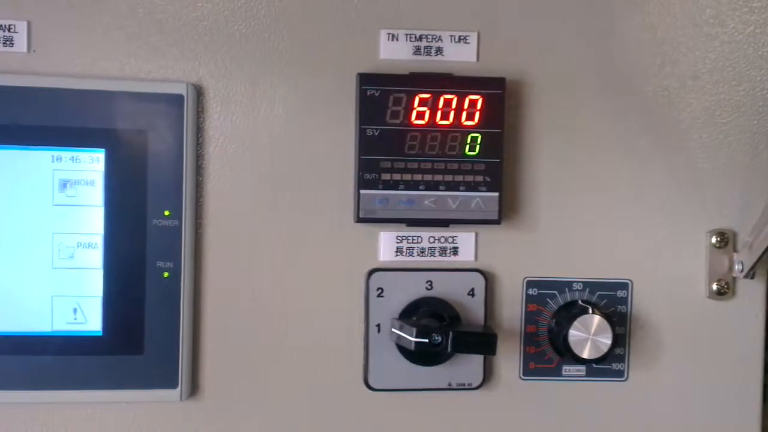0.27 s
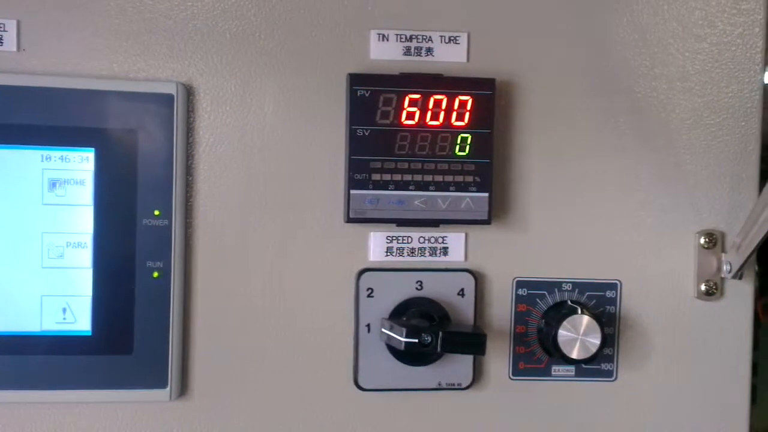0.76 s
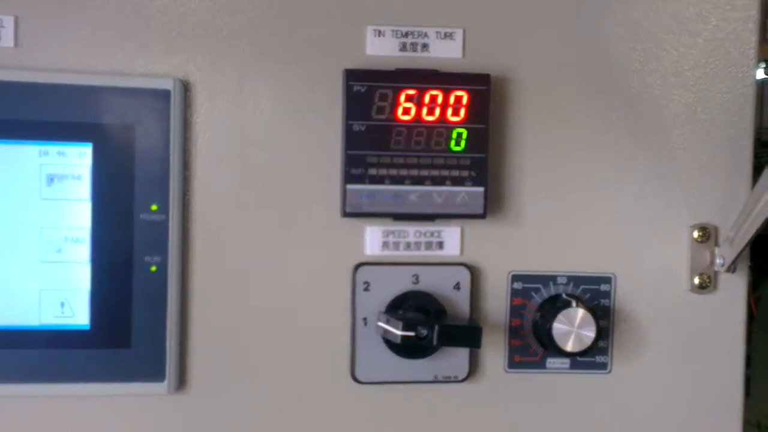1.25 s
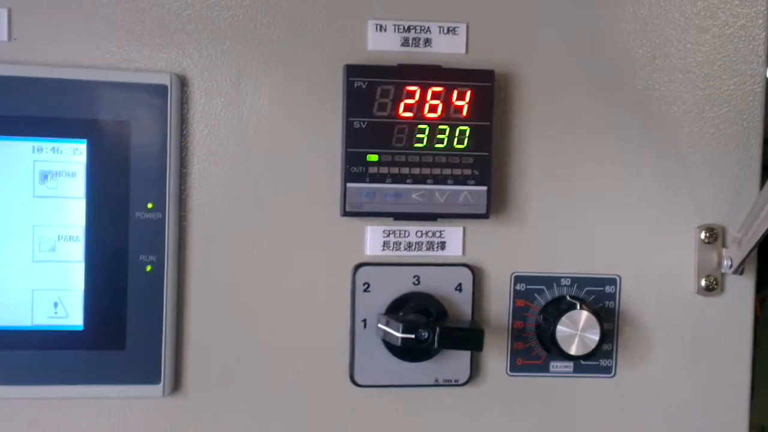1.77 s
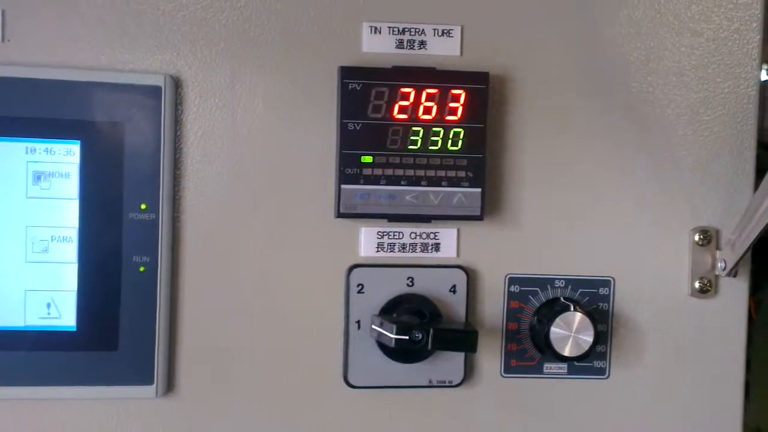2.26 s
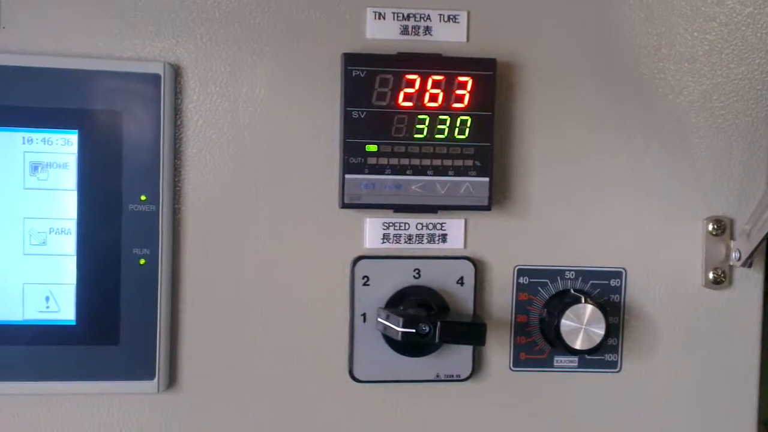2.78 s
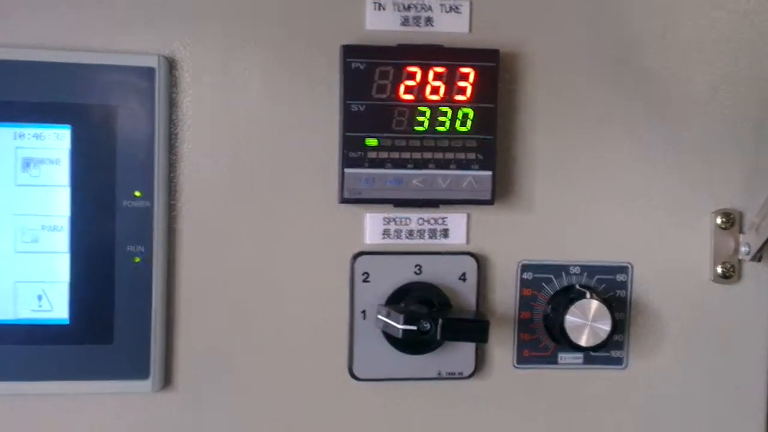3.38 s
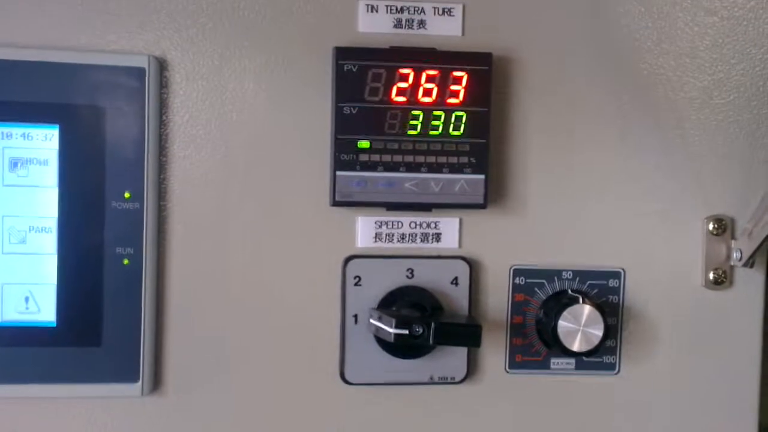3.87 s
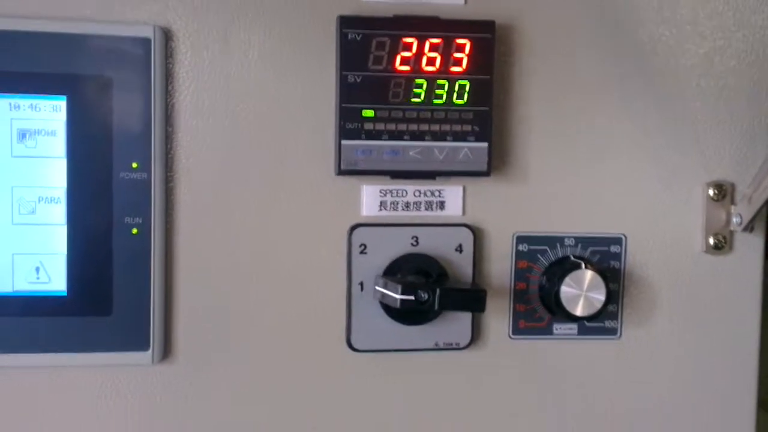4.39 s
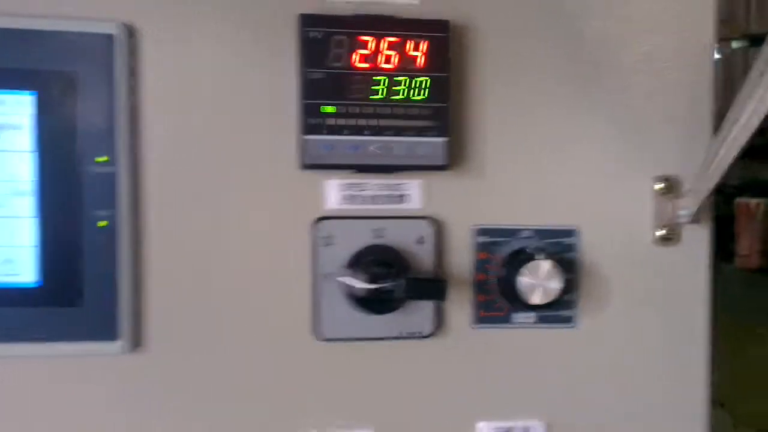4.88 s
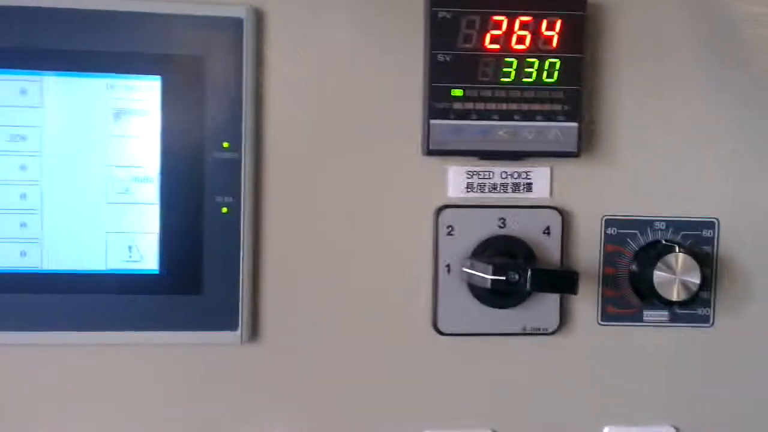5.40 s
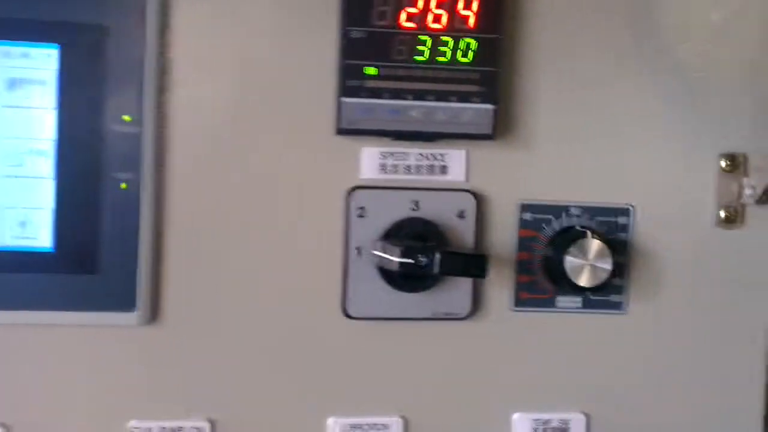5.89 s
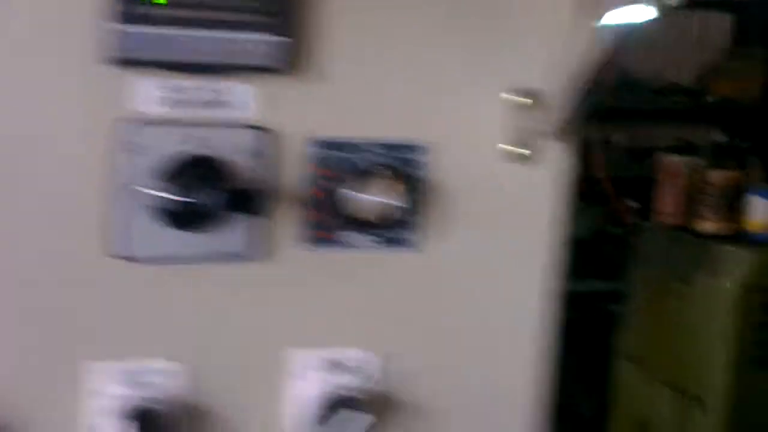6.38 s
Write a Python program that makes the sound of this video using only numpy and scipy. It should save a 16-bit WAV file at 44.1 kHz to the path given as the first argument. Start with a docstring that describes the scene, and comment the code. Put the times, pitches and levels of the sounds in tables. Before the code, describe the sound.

A quiet workshop murmurs around a machine control panel while gas leaks with a thin wavering hiss and soft puffs. Just before one second a sliding part squeals and scrapes; later a relay clicks and a panel hums faintly. Then a valve snaps open and a loud, bright, fluttering gas jet continues to the end, with a pump droning beneath. The close hand-held microphone overloads slightly on peaks.

```python
"""A loud, fluttering jet of gas hisses from an opening valve: shaped noise, ringing pipe tones and whistles. A
pump motor drones under it: harmonics of its stroke rate sound through two resonances of its casing. Before
that, a gas line leaks and puffs faintly in a murmuring workshop (shaped noise), a sliding part squeals (shaky
tone, ringing and scrape), something scrapes briefly, a relay clicks (noise burst) and a panel hums (two
resonances). The hand-held microphone is close enough to overload on the peaks of the jet."""
import sys
import numpy as np
from scipy import signal
from scipy.fft import rfft, irfft
from scipy.io import wavfile
from scipy.ndimage import uniform_filter1d

SR = 44100
rng = np.random.default_rng(int(sys.argv[2]) if len(sys.argv) > 2 else 0)


def dump(signal):
    """Clip the signal to [-1, 1] and save it as 16-bit WAV at the path in sys.argv[1]."""
    limited = np.clip(np.atleast_2d(signal).T, -1, 1)
    pcm = np.round(limited * 32767).astype(np.int16)
    wavfile.write(sys.argv[1], SR, pcm)


N = 293265
TIME = np.arange(N) / SR  # seconds


def amp(db):
    """Turns decibels into a gain."""
    return 10 ** (np.asarray(db) / 20)


def unit(x):
    """Scales a signal to rms 1."""
    return x / np.sqrt(np.mean(x ** 2) + 1e-20)


def follow(rows, column=1):
    """Draws straight lines between the points of a table, giving one value per sample."""
    rows = np.asarray(rows)
    return np.interp(TIME, rows[:, 0], rows[:, column])


def at_hz(points, hz):
    """Reads a spectrum at the given pitches, on a log-frequency axis."""
    point_hz, value = np.transpose(points)
    return np.interp(np.log(hz + 1), np.log(point_hz + 1), value)


def bump(peak_s, length_s):
    """Makes a bell in time, length_s wide at half its height."""
    return .5 ** ((2 * (TIME - peak_s) / length_s) ** 2)


def swell(start_s, db, attack_s, hold_s, fade_db_per_s):
    """Makes an envelope: a straight attack, a hold and a steady fade in decibels."""
    age = TIME - start_s
    fade_db = fade_db_per_s * np.maximum(age - attack_s - hold_s, 0)
    return np.clip(age / attack_s, 0, 1) * amp(db - fade_db)


def panned(db):
    """Gives left and right gains for a level difference, left minus right."""
    return amp(np.array([db, -db]).reshape(2, -1) / 2)


def wander(rate_hz):
    """Makes slow random motion of rms 1, up to about rate_hz."""
    ticks = TIME[::32]  # slow motion needs fewer points
    hz = np.fft.rfftfreq(len(ticks), ticks[1])
    spectrum = rfft(rng.standard_normal(len(ticks))) / (1 + (hz / rate_hz) ** 4)
    slow = irfft(spectrum, len(ticks))
    return np.interp(TIME, ticks, unit(slow))


def patches(field, size):
    """Smooths a random field (channel, frame, bin) over size = (frames, bins), then scales it to rms 1."""
    over_time = uniform_filter1d(field, size[0], axis=1)
    return unit(uniform_filter1d(over_time, size[1], axis=2))


# how alike the noise is in the left and right channels
# columns: pitch_hz [Hz], likeness [1 = identical]
LIKENESS = [(100, .7), (650, 0.75), (1300, 0.08), (3000, 0.22), (7000, .28), (14000, 0.23)]


def noise(colour, comb_db=0, ripple_db=0):
    """Makes coloured stereo noise; far reflections comb it finely, near ones broadly, as the microphone moves."""
    hz, frames = np.fft.rfftfreq(2048, 1 / SR), N // 512 + 5
    real, imaginary, far, near = rng.standard_normal((4, 2, frames, len(hz)))
    left, other = real + 1j * imaginary
    same = np.clip(at_hz(LIKENESS, hz), -1, 1)
    right = same * left + np.sqrt(1 - same ** 2) * other
    # adding the mean makes the reflections partly shared by both channels
    fine_db = comb_db * patches(far + far.mean(0), size=(36, 2))
    broad_db = ripple_db * patches(near + near.mean(0), size=(50, 11))
    spectra = np.array([left, right]) * amp(at_hz(colour, hz) + fine_db + broad_db)
    sound = signal.istft(spectra.swapaxes(1, 2), nperseg=2048, noverlap=1536)[1][:, :N]
    return sound / sound.mean(0).std()


def ringing(modes):
    """Shakes resonances (pitch_hz, width_hz, level_db) with random noise, partly different left and right."""
    hz = np.fft.rfftfreq(N, 1 / SR)
    power = 0
    for pitch_hz, width_hz, db in modes:
        resonance = unit(1 / (1 + (2 * (hz - pitch_hz) / width_hz) ** 2))
        power = power + (amp(db) * resonance) ** 2
    drive = rng.standard_normal((2, N)) + 0.85 * rng.standard_normal(N)
    sound = irfft(rfft(drive) * np.sqrt(power), N)
    return sound / sound.mean(0).std()


# colour of the workshop's murmur
# columns: pitch_hz [Hz], relative_level_db [dB per Hz]
SHOP_COLOUR = [(40, -50), (90, -39), (180, -26.5), (260, -6.5), (380, -6), (450, 0.5), (600, 0.5), (860, 1),
               (1100, 0), (1500, -3), (2000, -8), (3000, -4.5), (5000, -58)]


def workshop(murmur_db=-45.5, whine_db=-54):
    """The room murmurs as gently wavering noise, with two narrow resonances as a faint whine."""
    murmur = noise(SHOP_COLOUR, comb_db=2.5, ripple_db=1.5) * panned(1.0)
    whine = ringing([(443, 6, -3), (865, 8, 0)])
    return amp(murmur_db + 0.43 * wander(6)) * murmur + amp(whine_db) * whine


# level of the leak before its random wavering
# columns: time_s [s], level_db [dB]
LEAK_LEVEL = [(0, -36.5), (.7, -34.3), (1.5, -36.5), (2.3, -34.5), (2.65, -35.5), (3.15, -34)]
# colour of the leak's hiss
# columns: pitch_hz [Hz], relative_level_db [dB per Hz]
LEAK_COLOUR = [(900, -34), (1700, -18.5), (2100, -17), (2450, -9.5), (3200, -6.5), (4200, -9.5),
               (5600, -13.5), (7400, -10), (9000, -14.5), (11000, -22.5), (12500, -32), (14700, -40)]


def leak():
    """Gas escaping through a small gap hisses as coloured noise of wavering level."""
    return amp(follow(LEAK_LEVEL) + .5 * wander(10)) * noise(LEAK_COLOUR, comb_db=1.5) * panned(1.2)


# soft puffs of escaping air, and at 1.95 s a brief scrape (two bands) # columns: peak_s [s], length_s [s],
# level_db [dB], pitch_hz [Hz], width_octaves [octaves]
SOFT_BURSTS = [(0.245, 0.29, -36.5, 3000, 0.47), (0.687, 0.19, -37.5, 2750, 0.46), (1.95, .2, -35, 3050, 0.37),
               (1.95, 0.22, -41, 1050, 0.43), (2.27, 0.099, -29.5, 3020, 0.66)]


def soft_bursts():
    """Each soft puff of air, or the brief scrape, is a band of noise that swells and fades."""
    hz, puffs = np.fft.rfftfreq(N, 1 / SR) + 1, 0
    for peak_s, length_s, db, pitch_hz, width_octaves in SOFT_BURSTS:
        band = 1 / (1 + (np.log2(hz / pitch_hz) / width_octaves) ** 2 / 2) ** 2
        drive = rng.standard_normal((2, N)) + 0.8 * rng.standard_normal(N)
        air = irfft(rfft(drive) * band, N)
        puffs = puffs + amp(db) * bump(peak_s, length_s) * unit(air)
    return puffs * panned(3.5)


# the relay's click
# columns: start_s [s], level_db [dB]
CLICKS = [(1.8015, -27.5)]
# colour of the click
# columns: pitch_hz [Hz], relative_level_db [dB per Hz]
CLICK_COLOUR = [(200, -50), (600, -16), (2000, -14), (2800, 2), (3900, -1), (4800, 2), (5400, -13),
                (7800, -6), (12000, -27), (15000, -50)]


def relay(snap_s=0.0034, tail_s=0.081, tail_db=-15):
    """The relay snaps as a short noise burst, with a weaker tail for the cabinet's echo."""
    envelope = 0
    for start_s, db in CLICKS:
        age = np.maximum(TIME - start_s, 0)
        snap = np.exp(-(age / snap_s) ** 2)
        echo = amp(tail_db) * np.exp(-age / tail_s)
        envelope = envelope + amp(db) * (TIME > start_s) * (snap + echo)
    return envelope * noise(CLICK_COLOUR)


# resonances of the humming panel
# columns: pitch_hz [Hz], width_hz [Hz], relative_level_db [dB]
HUM_MODES = [(501.1, 7.4, -0.19), (526, 6.7, -2)]
HUM_START_S, HUM_ATTACK_S, HUM_PEAK_S = 2.3, .06, 2.88
HUM_DB = -42.5  # at the peak, before the throb
HUM_GROWTH_DB_PER_S, HUM_FADE_DB_PER_S = 12, 35
HUM_THROB_HZ, HUM_THROB_DB = 4.3, 2.5


def panel():
    """Two close resonances of a panel hum; the hum throbs, grows slowly and dies faster."""
    to_peak = HUM_PEAK_S - TIME
    level_db = HUM_DB - np.maximum(HUM_GROWTH_DB_PER_S * to_peak, -HUM_FADE_DB_PER_S * to_peak)
    throb_db = HUM_THROB_DB * np.cos(2 * np.pi * HUM_THROB_HZ * to_peak)
    attack = np.clip((TIME - HUM_START_S) / HUM_ATTACK_S, 0, 1)
    return attack * amp(level_db + throb_db) * ringing(HUM_MODES)


# slips of the sliding part, weaker each time
# columns: start_s [s], squeal_level_db [dB], hold_s [s]
SLIPS = [(0.908, -14.5, .038), (.981, -19, .014), (1.024, -19.5, .068), (1.165, -26.5, .06)]
SLIP_ATTACK_S, SLIP_FADE_DB_PER_S = .013, 135
# resonances of the squeal; the first is played as a clean tone
# columns: pitch_hz [Hz], width_hz [Hz], relative_level_db [dB]
SQUEAL_MODES = [(3650, 25, -1), (3557, 81, -4.5), (3405, 190, -6), (3100, 390, -16)]
# colour of the dry scrape
# columns: pitch_hz [Hz], relative_level_db [dB per Hz]
SCRAPE_COLOUR = [(300, -37), (1200, -10), (2000, -7), (2600, 1), (4300, -2), (6000, -7), (8500, -7),
                 (13000, -37), (16000, -45)]
# resonances of the shuddering frame
# columns: pitch_hz [Hz], width_hz [Hz], relative_level_db [dB]
FRAME_MODES = [(466, 73, 1), (660, 160, -0.5), (855, 140, 4), (1190, 110, -6.5)]
# envelopes of the scrape and the shudder, both starting with the first slip
# columns: level_db [dB], attack_s [s], hold_s [s], fade_db_per_s [dB per s]
SCRAPE_SHAPE = (-28, .012, .1, 38)
SHUDDER_SHAPE = (-31.5, 0, .13, 150)
# the frame knocks as the part gets going
# columns: peak_s [s], length_s [s], change_db [dB]
KNOCK = (0.94, .022, 5.4)


def slide(chatter_db=1.3, breakup_db_per_s=45):
    """A part sticks and slips along its guide: a chattering squeal, a dry scrape and a shudder of the frame."""
    start_s = SLIPS[0][0]
    (pitch_hz, waver_hz, tone_db), *side_modes = SQUEAL_MODES
    shaky_hz = pitch_hz + 0.67 * waver_hz * wander(60)
    tone = np.sqrt(2) * np.sin(2 * np.pi * np.cumsum(shaky_hz) / SR)
    # the clean note breaks up as the part slows
    purity = amp(tone_db - breakup_db_per_s * np.clip(TIME - start_s, 0, 1))
    voice = purity * tone + amp(-5.5) * ringing(side_modes)
    slip_power = sum(swell(s, db, SLIP_ATTACK_S, hold_s, SLIP_FADE_DB_PER_S) ** 2 for s, db, hold_s in SLIPS)
    squeal = np.sqrt(slip_power) * amp(chatter_db * wander(90)) * voice
    scrape = swell(start_s, *SCRAPE_SHAPE) * noise(SCRAPE_COLOUR, comb_db=4.0)
    knock_s, knock_length_s, knock_db = KNOCK
    knock = amp(knock_db * bump(knock_s, knock_length_s))
    shudder = swell(start_s, *SHUDDER_SHAPE) * knock * ringing(FRAME_MODES)
    return squeal + scrape + shudder


# the pump's speed
# columns: time_s [s], strokes_hz [strokes per s]
PUMP_SPEED = [(3.2, 46), (4.0, 44.8), (4.5, 42.3), (4.85, 42.3), (5.2, 43.7), (6.65, 43.7)]
# the pump works up and eases off
# columns: time_s [s], effort_db [dB]
PUMP_EFFORT = [(3.2, -46), (3.6, -35), (4.2, -37), (4.9, -27), (5.55, -21.7), (6.4, -31), (6.65, -30)]
# low and high resonances of the casing
# columns: pitch_hz [Hz], relative_level_db [dB]
PUMP_LOW = [(300, -29.5), (350, -16), (435, -17.5), (478, 1.5), (500, 5), (525, 2.5), (565, -41),
            (612, -0.5), (660, -16)]
PUMP_HIGH = [(650, -19), (700, -7), (740, 5.5), (825, 8.5), (872, -12), (915, 7), (960, -18), (1048, -3),
             (1180, -17), (1265, -4.5), (1350, -33), (1530, -6), (1660, -19), (1750, -30)]
# moments when the low resonance booms
# columns: peak_s [s], length_s [s], change_db [dB]
BOOMS = [(3.76, .14, 8), (4.25, .2, 3), (4.882, .12, 8.5), (5.13, .07, 9), (5.79, .14, 5.5)]
# the low resonance has LOW_DB at the reference effort and follows a share of the effort's changes
LOW_DB, REFERENCE_EFFORT_DB, LOW_SHARE = -37, -27.5, .65
LOW_PAN_DB, HIGH_PAN_DB = -7.5, -4.5  # left minus right: both sit to the right


def pump(turns, rough=0.51, waver_db=1.1):
    """Wavering harmonics of the stroke rate slide through the low and the high resonances of the casing."""
    speed_hz, effort_db, sound = follow(PUMP_SPEED), follow(PUMP_EFFORT), 0
    boom_db = sum(db * bump(peak_s, length_s) for peak_s, length_s, db in BOOMS)
    low_db = LOW_DB + LOW_SHARE * (effort_db - REFERENCE_EFFORT_DB) + boom_db
    for casing, level_db, pan_db in [(PUMP_LOW, low_db, LOW_PAN_DB), (PUMP_HIGH, effort_db, HIGH_PAN_DB)]:
        drone = 0
        first, last = np.ceil(casing[0][0] / speed_hz[-1]), casing[-1][0] / speed_hz[-1]
        for multiple in np.arange(first, last):
            phase = 2 * np.pi * (multiple * turns + rng.random()) + 0.68 * wander(9.6)
            strength = amp(at_hz(casing, multiple * speed_hz)) * (1 + rough * wander(10.3))
            drone = drone + strength * np.cos(phase)
        sound = sound + amp(level_db + waver_db * wander(5.4)) * unit(drone) * panned(pan_db)
    return sound


# level of the low roar, before the flow's changes
# columns: time_s [s], level_db [dB]
ROAR_LEVEL = [(3.2, -31.5), (3.55, -29.5), (4.2, -28.7), (4.5, -26), (4.8, -27.8), (5.4, -25.5),
              (6.65, -28.5)]
# colour of the low roar
# columns: pitch_hz [Hz], relative_level_db [dB per Hz]
ROAR_COLOUR = [(180, -44), (320, -26.5), (430, -10), (500, -18), (570, -5), (680, -3.5), (820, 2),
               (1000, 0.5), (1300, -2.5), (1500, 2), (1850, -0.5), (2200, -2), (2900, -15), (4800, -70)]
# the roar starts thin: edge of its bass, change of the bass at first, time to fill in
BASS_EDGE_HZ, BASS_THIN_DB, BASS_FILL_S = 1050, -7, 1.5


def roar(age, comb_db=4.6, ripple_db=2.7):
    """The jet's low roar is noise whose bass fills in with the time since the valve opened."""
    full = noise(ROAR_COLOUR, comb_db=comb_db, ripple_db=ripple_db)
    low_pass = signal.butter(4, BASS_EDGE_HZ, fs=SR, output="sos")
    bass = signal.sosfiltfilt(low_pass, full)
    bass_gain = amp(BASS_THIN_DB * np.maximum(1 - age / BASS_FILL_S, 0))
    return amp(follow(ROAR_LEVEL)) * (full - bass + bass_gain * bass) * panned(-1.8)


# the nozzle sings briefly at changing pitches; levels before the flow's changes
# columns: peak_s [s], length_s [s], level_db [dB], pitch_hz [Hz], width_hz [Hz]
WHISTLES = [(3.46, .3, -30.5, 1466, 16), (4.2, .35, -26, 4480, 170), (4.5, .12, -35, 1466, 30),
            (5.0, .12, -24, 3400, 400), (5.32, .22, -20.5, 2770, 220)]


def nozzle_whistles():
    """Each whistle is a tone that swells and fades while turbulence shakes its pitch."""
    whistles = 0
    for peak_s, length_s, db, pitch_hz, width_hz in WHISTLES:
        shaky_hz = pitch_hz + .5 * width_hz * wander(width_hz)
        tone = np.sqrt(2) * np.sin(2 * np.pi * np.cumsum(shaky_hz) / SR)
        whistles = whistles + amp(db) * bump(peak_s, length_s) * tone
    return whistles


# levels of the bright hiss and the pipe's band, before the flow's changes
# columns: time_s [s], hiss_level_db [dB], pipe_level_db [dB]
JET_LEVELS = [(3.2, -13.7, -17), (3.62, -16.7, -13.2), (3.95, -14.7, -14.8), (4.25, -15.2, -17),
              (5.0, -14.4, -16.5), (5.55, -15, -17.2), (6.25, -14.7, -14.6), (6.5, -17.3, -18.6),
              (6.65, -17, -17.6)]
# colours of the bright hiss and of the pipe's band
# columns: pitch_hz [Hz], relative_level_db [dB per Hz]
HISS_COLOUR = [(2350, -35), (4000, -7.5), (4450, -3), (4800, -1.5), (5800, -3.5), (7000, 0.5), (7550, 1.5),
               (7850, -0.5), (8350, -1), (9300, -3), (10000, -7), (12000, -17.5), (14700, -28.5)]
PIPE_COLOUR = [(1120, -41), (1900, -15.5), (2160, -18.5), (2320, -1.5), (2580, 2), (3100, 2), (3350, -3),
               (3650, 0), (3990, -6.5), (4300, -7), (5590, -69), (9460, -120)]
# narrow resonances of the gas line that ring in the hiss
# columns: pitch_hz [Hz], width_hz [Hz], relative_level_db [dB]
LINE_MODES = [(2620, 40, 0), (2894, 40, -2), (3118, 40, 0), (3358, 30, -4), (3633, 30, -6), (3779, 45, -3),
              (4400, 110, -2), (4545, 70, -1.5), (8333, 50, -5)]
# the strongest spurts and chokes of the flow
# columns: peak_s [s], length_s [s], change_db [dB]
SPURTS = [(4.485, .02, 3), (4.645, .04, 2), (5.0, .045, 1.8), (5.172, .025, -3.5), (5.47, .05, -2.7),
          (5.945, .03, -3.5), (6.11, .025, 2.5), (6.352, .025, -5), (6.395, .022, 3), (6.545, .035, -3.5)]
VALVE_S, VALVE_OPENING_S = 3.187, .014  # when the valve starts to open, and how long it takes
# the stored pressure overshoots and rings out
SURGE_DB, SURGE_HZ, SURGE_DECAY_S = 5, 8.9, 0.13
# left minus right at the opening; it drifts to the right as the microphone moves
JET_PAN_DB, JET_DRIFT_DB_PER_S = -1.2, -1.05


def jet(turns, flutter_db=0.66, throb_db=0.34):
    """Turbulent gas: bright hiss, the pipe's band, a low roar and thin whistles share one unsteady flow."""
    age = np.maximum(TIME - VALVE_S, 0)
    flutter = flutter_db * wander(26)
    throb = throb_db * np.sin(2 * np.pi * turns)  # each pump stroke ripples the flow
    surge = SURGE_DB * np.exp(-age / SURGE_DECAY_S) * np.sin(2 * np.pi * SURGE_HZ * age)
    spurts = sum(db * bump(peak_s, length_s) for peak_s, length_s, db in SPURTS)
    flow_db = flutter + throb + surge + spurts
    hiss = amp(follow(JET_LEVELS)) * noise(HISS_COLOUR, comb_db=3.0, ripple_db=0.9)
    pipe = noise(PIPE_COLOUR, comb_db=3.0, ripple_db=2.0) + amp(-3.8) * ringing(LINE_MODES)
    pipe = amp(follow(JET_LEVELS, column=2)) * pipe / pipe.mean(0).std()
    gas = hiss + pipe + roar(age) + nozzle_whistles()
    return amp(flow_db) * gas * panned(JET_PAN_DB + JET_DRIFT_DB_PER_S * age)


def scene():
    """The quiet workshop sounds first, then the valve lets the jet and the pump in."""
    turns = np.cumsum(follow(PUMP_SPEED)) / SR  # pump strokes so far
    valve = np.clip((TIME - VALVE_S) / VALVE_OPENING_S, 0, 1)
    background = workshop() + leak() + soft_bursts()
    return background + relay() + panel() + slide() + valve * (pump(turns) + jet(turns))


# the left port is the more sensitive in the upper middle
# columns: pitch_hz [Hz], left_minus_right_db [dB]
PORT_BALANCE = [(700, 0), (1300, 1.2), (3100, 1.7), (5800, -1.4), (9500, 1), (13000, 0)]


def record(dry, low_cut_hz=165, ceiling=.91, edge_hz=14950):
    """The microphone cuts the bass, colours each port, clips the peaks and then limits the treble."""
    high_pass = signal.butter(6, low_cut_hz, "highpass", fs=SR, output="sos")
    thin = signal.sosfilt(high_pass, dry)
    hz = np.fft.rfftfreq(N, 1 / SR)
    thin = irfft(rfft(thin) * panned(at_hz(PORT_BALANCE, hz)), N)
    clipped = np.clip(thin, -ceiling, ceiling)  # overload adds a faint low sputter
    low_pass = signal.firwin(511, edge_hz, window=("kaiser", 9), fs=SR)
    return signal.oaconvolve(clipped, low_pass[None], "same")


dry = scene()
out = record(dry)
dump(out)
```